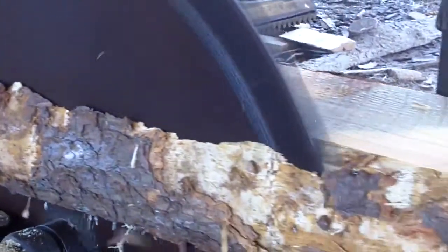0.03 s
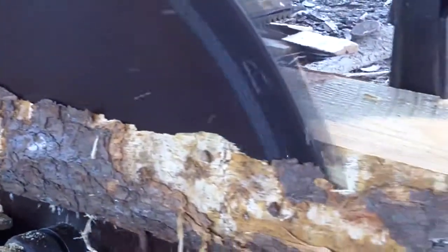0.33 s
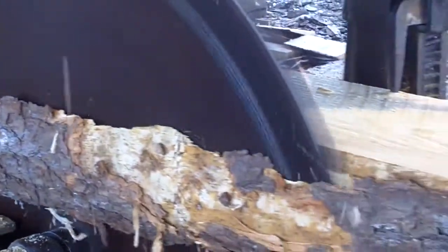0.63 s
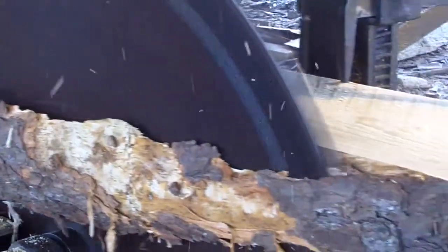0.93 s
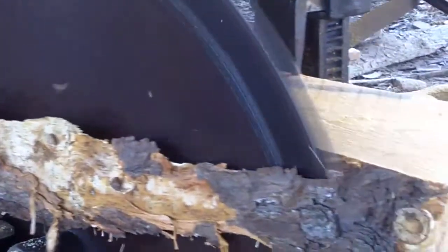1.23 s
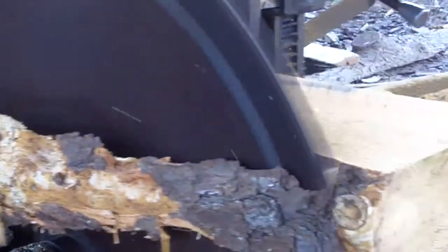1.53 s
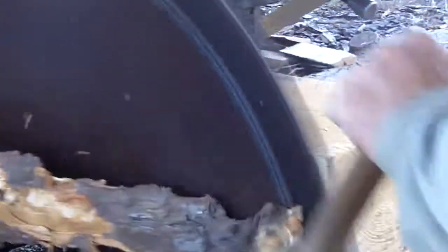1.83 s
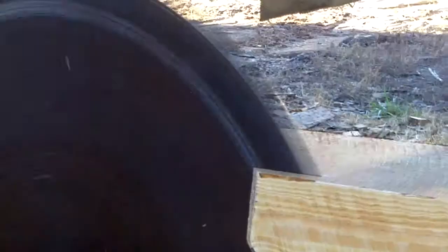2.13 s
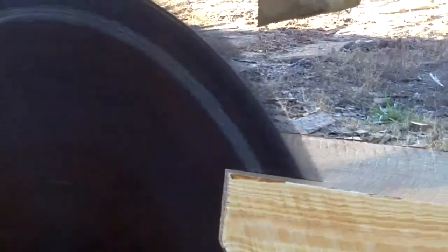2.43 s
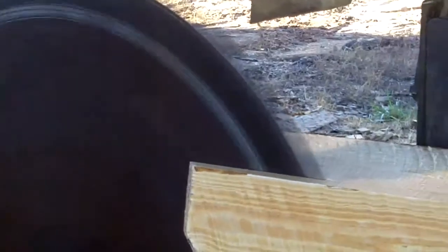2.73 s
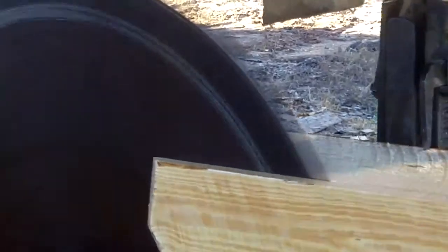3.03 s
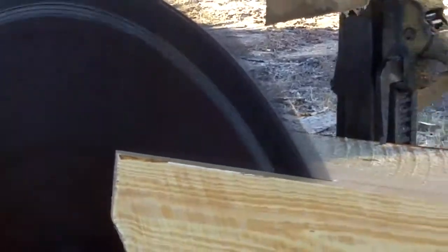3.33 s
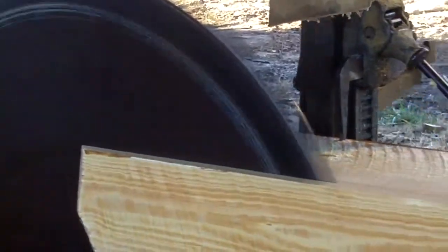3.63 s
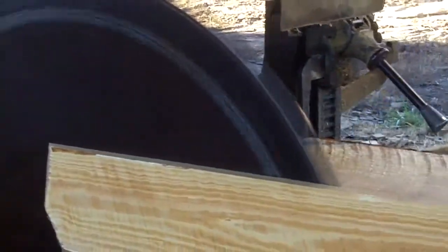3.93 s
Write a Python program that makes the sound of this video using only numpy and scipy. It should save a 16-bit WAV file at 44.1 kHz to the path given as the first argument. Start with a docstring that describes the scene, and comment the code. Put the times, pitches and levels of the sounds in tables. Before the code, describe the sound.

A big circular saw blade rips through a log, breaks off briefly, then cuts again.

```python
"""A big circular sawmill blade ripping through a log, close to the microphone, outdoors, in mono.
Its teeth tear the fibres, sing at their passing rate and throw a hiss of chips; behind them the disc
throbs and the drive drones. The first cut runs out of the wood. The sound breaks off for half a
second, with two faint ticks, and returns in the middle of a heavier cut."""
import sys
import numpy as np
from scipy import signal
from scipy.fft import rfft, irfft, next_fast_len
from scipy.io import wavfile
from scipy.ndimage import map_coordinates

SR = 44100
rng = np.random.default_rng(int(sys.argv[2]) if len(sys.argv) > 2 else 0)


def transcribe(u):
    """Save the signal u as a 16-bit wav file named by the first command-line argument.

    u: samples, shape (n,) or (channels, n), limited to [-1, 1]; the rate is SR.
    q: integer samples, one column per channel.
    """
    v = np.clip(np.atleast_2d(u).T, -1, 1)
    q = np.round(v * 32767).astype(np.int16)
    wavfile.write(sys.argv[1], SR, q)


N = 176400
T = np.arange(N) / SR
TEETH = 48
TICK_TIMES_S, TICK_STEP_DB = (2.0705, 2.2705), -42

# the two cuts: start t/s, end t/s
CUT_SPANS = [(0, 1.93), (2.441, 4.01)]
# tooth rate, sagging under load: t/s, f/Hz
TOOTH_RATE = [(0, 393.4), (.2, 396.4), (.45, 398.8), (.8, 403), (1.1, 408), (1.55, 408.8), (1.93, 409),
              (2.44, 386.6), (2.55, 385.3), (2.8, 385.6), (3.1, 381.3), (3.25, 383.8), (3.65, 381),
              (3.85, 381.8), (4, 387)]
# load in each cut, before its trims: t/s, tearing level/dB, chip level/dB
FIRST_LOAD = [(0, -24, -30.5), (.04, -24, -32), (.08, -27, -32), (.25, -26, -31), (.42, -24, -32),
              (.52, -27, -31), (0.601, -24.5, -32.5), (.76, -28, -33), (.92, -27.5, -32), (1.18, -30, -32),
              (1.26, -29.5, -31), (1.45, -29, -31), (1.55, -27, -31.5), (1.68, -28.5, -29),
              (1.77, -29, -33), (1.85, -42, -53.5), (1.925, -57, -62)]
SECOND_LOAD = [(2.44, -27, -30), (2.52, -24.5, -29.5), (2.68, -26, -29), (2.85, -24.5, -29),
               (2.96, -26, -29.5), (3.08, -25, -28), (3.16, -27, -31), (3.24, -24.5, -29.5),
               (3.38, -25.5, -29), (3.52, -27.5, -29), (3.7, -24.5, -29), (3.8, -25, -27), (4, -27, -30)]
# tooth tone, relative to the load: harmonic number, first-cut level/dB, second-cut level/dB
TOOTH_HARMONICS = [(2, -19.5, -24), (4, -9.5, -14), (5, -32, -10), (6, -9.5, -10.5), (7, -13, -10.5),
                   (8, -22.5, -14.5)]
# its third harmonic, which swells on its own: t/s, level/dB
THIRD_HARMONIC = [(0, -32), (.12, -34), (.25, -43.5), (.6, -37), (1, -42.5), (1.25, -39), (1.4, -46),
                  (1.52, -39), (1.75, -37.5), (1.9, -50.5), (2.44, -35.5), (2.58, -33), (2.75, -43),
                  (3.1, -43), (3.3, -39), (3.6, -39), (3.7, -53), (4, -33.5)]
# colour of log and blade in each cut: f/Hz, relative level/dB
FIRST_WOOD = [(200, -29), (600, -20), (1000, -7.5), (1450, -6), (1700, -4), (2300, -1), (2600, -2.5),
              (3150, -6), (3600, -14.5), (4500, -24), (7000, -56.5)]
SECOND_WOOD = [(200, -21.5), (600, -17.5), (1000, -16.5), (1450, -11.5), (1800, -3), (2100, -1),
               (2450, 0.5), (2750, 0), (2950, -10.5), (3550, -11), (4500, -26), (7000, -48)]
# colour of the chips in each cut, and the low end they share: f/Hz, relative level/dB
FIRST_CHIPS = [(2820, -39), (4800, -13), (6690, -1.5), (7570, -1), (11600, -21), (14900, -41.5)]
SECOND_CHIPS = [(2820, -43), (4800, -8), (5720, -1), (7460, 2.5), (11600, -23), (14900, -36)]
CHIP_LOW_END = [(1000, -42), (3500, -6)]
# kerf resonance, falling as the cut deepens: t/s, f/Hz, level/dB
KERF_GLIDE = [(0, 3063, -42), (.22, 2850, -31), (.4, 2557, -27), (.52, 2266, -23.5), (.6, 2147, -33.5),
              (.77, 2200, -28), (.95, 2100, -39.5), (1.3, 1990, -50)]
# whine of the blade: t/s, f/Hz, level/dB
BLADE_WHINE = [(0, 787, -33), (.12, 790, -36.5), (.25, 794.7, -39), (.35, 799, -36), (.6, 804, -34),
               (.8, 806, -41), (1.4, 810, -42.5), (1.6, 810, -36.5), (1.8, 806, -34), (1.93, 808, -36)]
# throb of the disc: multiple of the shaft rate, first-cut level/dB, second-cut level/dB
DISC_THROB = [(3, -51.5, -53), (4, -52, -51), (5, -56, -49), (6, -58, -56), (7, -45, -44), (12, -69, -55.5)]
# drive tones in each cut: f/Hz, level/dB at average rush
FIRST_DRIVE = [(161.5, -52), (193.8, -49), (279, -50.5), (344, -52), (673, -55.5), (904.4, -46.5),
               (1093, -55.5), (1290, -50.5), (1410, -54.5)]
SECOND_DRIVE = [(199.2, -52.5), (287, -52), (341, -47), (576, -50), (635.2, -60), (1087, -63), (1270, -48)]
# colour of the machine's rush: f/Hz, relative level/dB
RUSH_COLOUR = [(15, -7), (40, 0), (70, -1), (105, -3), (180, -1), (240, -1.5), (380, 0), (520, -3.5),
               (700, 0.5), (950, -1), (1500, -1.5), (2400, -7), (3300, -21.5), (5000, -28), (8000, -31.5),
               (14000, -56)]
# swell of that rush: t/s, level/dB
RUSH_LEVEL = [(0, -36), (.5, -35.5), (1, -33.5), (1.5, -34), (1.93, -32), (2.44, -36.5), (3.1, -36),
              (4, -36)]
# low hum: t/s, level/dB
HUM_LEVEL = [(0, -50), (.17, -43), (.3, -57), (.9, -46.5), (1.08, -42), (1.35, -51.5), (1.55, -40.5),
             (1.8, -42.5), (1.92, -46.5), (2.44, -42), (2.65, -39.5), (3, -40.5), (3.14, -55),
             (3.32, -38.5), (3.55, -40.5), (3.7, -43.5), (4, -50)]


def sawing(teeth, cut, load, wood, chips, drive, tear_db, spray_db):
    """The saw from close by in cut 0 or 1; teeth is the running count of tooth passes."""
    load_db, chips_db = curves(load)
    third = amp(curves(THIRD_HARMONIC)[0]) * partial(3 * teeth, waver_db=3, smear=.45, rate=40)
    timber = amp(load_db) * (amp(tear_db) * tearing(teeth, wood) + tooth_tone(teeth, cut))
    hiss = amp(chips_db + spray_db) * chip_spray(teeth, chips)
    return timber + third + hiss + machine(teeth, cut, drive)


def bites(teeth, depth):
    """Force on the wood: one swell per tooth, each tooth with its own sharpness."""
    sharpness = amp(rng.standard_normal(TEETH))
    return sharpness[teeth.astype(int) % TEETH] * np.exp(-depth * np.cos(2 * np.pi * teeth))


def tearing(teeth, wood):
    """Fibres snap in a burst under each tooth and ring in log and blade."""
    wood_grain = amp(.6 * wobble(45))
    snaps = impulses(per_s=12000, spread_db=2.3) * bites(teeth, depth=.5) * wood_grain
    return coloured(frame_echo(snaps, t60=.16, wet_db=-4), wood)


def frame_echo(x, t60, wet_db):
    """Short scattered echoes off the disc and the steel carriage."""
    t = T[:SR // 4]
    tail = rng.standard_normal(len(t)) * amp(-60 * t / t60)
    echoes = signal.fftconvolve(x, tail / np.linalg.norm(tail))[:N]
    return unit(x + amp(wet_db) * echoes)


def tooth_tone(teeth, cut):
    """Harmonics of the tooth rate, roughened by uneven grain; each flares and fades on its own."""
    rough = teeth + .011 * wobble(130)
    return sum(amp(levels[cut]) * partial(k * rough, waver_db=4.5, smear=.6, rate=26)
               for k, *levels in TOOTH_HARMONICS)


def chip_spray(teeth, colour):
    """Sawdust and chips pelt the steel so densely that they merge into a hiss."""
    hits = impulses(per_s=11000, spread_db=2.5) * bites(teeth, depth=.13)
    flicker = amp(.73 * wobble(90))
    return coloured(hits * flicker, CHIP_LOW_END + list(colour))


def kerf(teeth, half_width_hz=240):
    """The slot in the log resonates with a rasp that slides down in pitch."""
    hz, db = curves(KERF_GLIDE)
    chatter = rng.standard_normal((2, N)) * bites(teeth, depth=.5)
    real, imag = (filtered(c, lambda f: 1 / (1 + (f / half_width_hz) ** 2)) for c in chatter)
    phase = 2 * np.pi * np.cumsum(hz) / SR
    return amp(db) * unit(real * np.cos(phase) + imag * np.sin(phase))


def whine():
    """The blade whines through the first cut and rings on as it leaves the wood."""
    hz, db = curves(BLADE_WHINE)
    return amp(db) * partial(np.cumsum(hz) / SR, waver_db=2.5, smear=.48, rate=50)


def machine(teeth, cut, drive):
    """Behind the cut, the disc throbs at multiples of its turning rate; the drive drones and rushes."""
    rush_db, = curves(RUSH_LEVEL)
    throb = sum(amp(levels[cut]) * partial(k * teeth / TEETH, waver_db=.6, smear=.08, rate=5)
                for k, *levels in DISC_THROB)
    drone = sum(amp(db) * partial(hz * T, waver_db=1.5, smear=.6, rate=16) for hz, db in drive)
    rush = coloured(rng.standard_normal(N) * bites(teeth, depth=.1), RUSH_COLOUR)
    return throb + amp(rush_db - rush_db.mean()) * drone + amp(rush_db) * rush


def hum(cycles):
    """Low in the background, two close tones beat about twice per turn of the disc."""
    pair = (partial(cycles * ratio, waver_db=2, smear=.31, rate=20) for ratio in (1, 1 + 2 / TEETH))
    return amp(curves(HUM_LEVEL)[0]) * unit(sum(pair))


def amp(db):
    """Decibels to gain."""
    return 10 ** (np.asarray(db) / 20)


def unit(x):
    """Scaled to rms 1."""
    return x / np.sqrt(np.mean(x ** 2) + 1e-20)


def curves(rows):
    """One value per sample for each column after the time."""
    times, *columns = np.transpose(rows)
    return [np.interp(T, times, column) for column in columns]


def during(span):
    """1 inside a span of time, 0 outside."""
    return (T >= span[0]) & (T < span[1])


def wobble(rate):
    """A smooth random curve, rate knots a second."""
    return map_coordinates(rng.standard_normal(4096), [T * rate], mode="mirror")


def partial(cycles, waver_db, smear, rate):
    """A tone of rms 1 whose level wanders by waver_db and whose phase wanders by smear radians."""
    gain = amp(waver_db * wobble(rate / 2))
    phase = 2 * np.pi * (cycles + rng.random()) + smear * wobble(rate)
    return unit(gain * np.sin(phase))


def impulses(per_s, spread_db):
    """Randomly timed impulses of either sign and unequal size."""
    hits = rng.random(N) < per_s / SR
    return hits * np.sign(rng.standard_normal(N)) * amp(spread_db * rng.standard_normal(N))


def filtered(x, response):
    """x through a gain that depends on frequency."""
    size = next_fast_len(N + 8192)
    return irfft(rfft(x, size) * response(np.fft.rfftfreq(size, 1 / SR)), size)[:N]


def coloured(x, colour, size=8192):
    """x through a ringing body of the given colour, at rms 1."""
    hz, db = np.transpose(colour)
    bin_db = np.interp(np.log(np.fft.rfftfreq(size, 1 / SR) + 1), np.log(hz), db)
    cepstrum = irfft(np.log(amp(bin_db)))
    cepstrum[1:size // 2] *= 2  # minimum phase: the ring follows the hit
    cepstrum[size // 2:] = 0
    ring = irfft(np.exp(rfft(cepstrum)))
    return unit(signal.fftconvolve(x, ring)[:N])


def scene():
    """Beside the saw: two cuts with two ticks in the gap, the same in both channels."""
    teeth = np.cumsum(curves(TOOTH_RATE)[0]) / SR
    first = sawing(teeth, 0, FIRST_LOAD, FIRST_WOOD, FIRST_CHIPS, FIRST_DRIVE, tear_db=-1.5, spray_db=.4)
    first += whine() + kerf(teeth) + hum(378.3 * T)  # hum at a steady pitch, in Hz
    second = sawing(teeth, 1, SECOND_LOAD, SECOND_WOOD, SECOND_CHIPS, SECOND_DRIVE,
                    tear_db=-2.05, spray_db=.75)
    second += hum(teeth)
    ticks = amp(TICK_STEP_DB) * during(TICK_TIMES_S)  # one step up, one step down
    mono = first * during(CUT_SPANS[0]) + second * during(CUT_SPANS[1]) + ticks
    return np.array([mono, mono])


def record(dry, notch_hz=4226, top_hz=15050):
    """The microphone has a deep notch in the presence range and a steep band limit."""
    def response(hz):
        skirt_db = -8 * np.exp(-((hz - notch_hz) / 310) ** 2)
        core_db = -11.5 * np.exp(-((hz - notch_hz) / 90) ** 2)
        return amp(skirt_db + core_db) * np.clip((top_hz - hz) / 100, 0, 1)
    return np.array([filtered(channel, response) for channel in dry])


dry = scene()
out = record(dry)
transcribe(out)
```